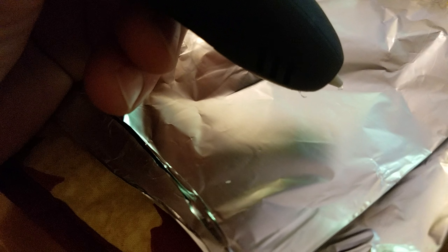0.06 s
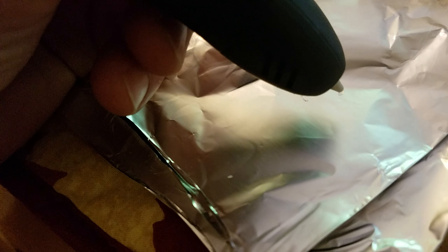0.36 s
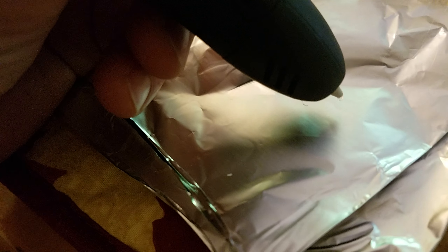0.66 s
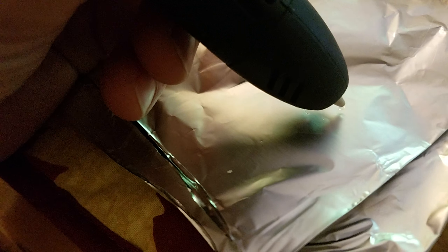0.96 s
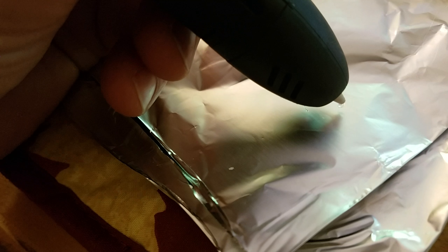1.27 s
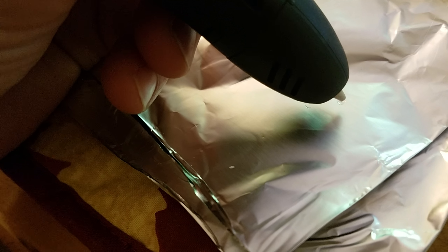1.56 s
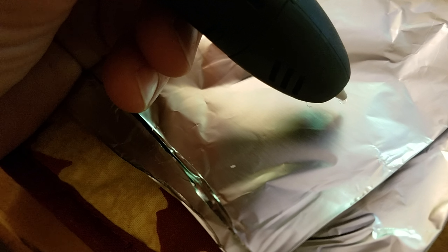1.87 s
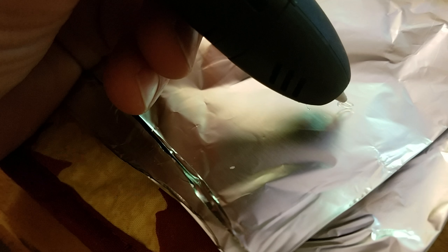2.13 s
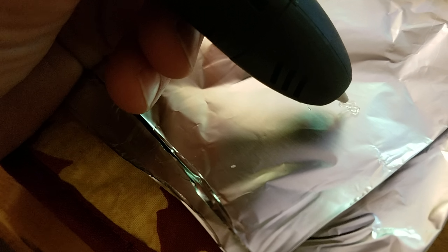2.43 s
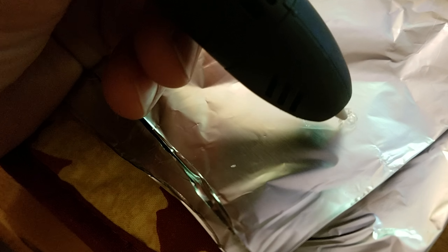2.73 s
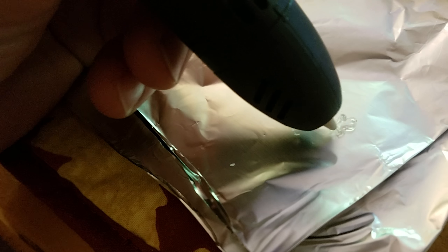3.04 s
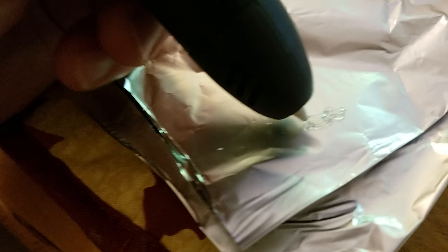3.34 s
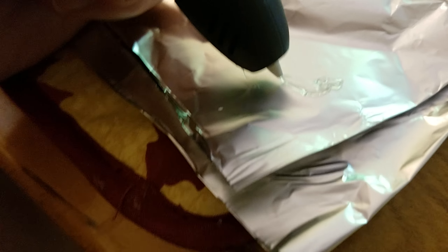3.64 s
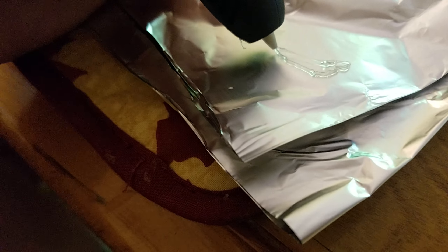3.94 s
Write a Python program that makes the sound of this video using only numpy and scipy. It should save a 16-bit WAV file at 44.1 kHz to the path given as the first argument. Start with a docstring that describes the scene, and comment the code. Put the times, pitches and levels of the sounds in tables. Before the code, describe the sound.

A 3D printing pen's small motor rasps and whines in rapid, even pulses, close on the left in a quiet room. One sharp snap comes before the middle, and soft finger thumps on the right cluster near the end.

```python
"""A handheld 3D printing pen feeds filament slowly, close to the left microphone in a quiet, small room.
Its geared motor is switched on about ten times a second, spins up with a rising whine and a gear rasp,
and coasts down again. The pen gives one sharp snap and a few small ticks. Fingers bump and rub the
camera body by the right microphone, which hears the pen more faintly."""
import sys
import numpy as np
from scipy import signal
from scipy.fft import rfft, irfft, next_fast_len
from scipy.io import wavfile
from scipy.ndimage import map_coordinates

SR = 44100
rng = np.random.default_rng(int(sys.argv[2]) if len(sys.argv) > 2 else 0)


def dump_mix(stems):
    """Bounce the given channels to the path in sys.argv[1] as a 16-bit WAV at rate SR."""
    frames = np.atleast_2d(stems).T  # one column per channel
    limited = np.clip(frames, -1, 1)  # hard clip at full scale
    pcm = np.round(limited * 32767).astype(np.int16)
    wavfile.write(sys.argv[1], SR, pcm)


N = 176400


def motor(teeth=9, far_alike=0.44):
    """The pen's gears rasp and whine close to the left microphone; the right one stands in shadow."""
    # gain at the far microphone against the near one (frequency [Hz], gain [dB])
    shadow = [(300, 14.5), (1000, -6), (1600, -9.5), (3000, -19), (5000, -17.5), (7800, -66), (10000, -41),
              (14000, -20.5), (15500, -53)]
    speed, tooth_hz, force = drive()
    tooth_phase = 2 * np.pi * np.cumsum(tooth_hz) / SR
    rasp, stray_rasp = gear_rasp(tooth_phase / teeth, speed, force)
    whine = gear_whine(tooth_phase, speed, force)
    far = whine + far_alike * rasp + np.sqrt(1 - far_alike ** 2) * stray_rasp
    return np.array([rasp + whine, far_microphone(far, shadow)])


def drive(on_s=.050, spin_up_s=.018, coast_s=.025):
    """Each pulse spins the motor up, then it coasts: speed (share of full), tooth rate in Hz, gear force."""
    # motor pulses (time [s], tooth rate the motor heads for [Hz], level [dB])
    pulses = [(.002, 3045, -1.5), (0.097, 3600, -1), (0.194, 3505, -1), (0.291, 3380, -1), (.390, 3786, -1),
              (.486, 3870, -1), (0.583, 3500, -0.5), (.682, 3870, -1), (0.78, 3902, -1), (.875, 3640, -1),
              (.977, 4050, -0.5), (1.070, 3750, -1), (1.169, 3840, -1.5), (1.269, 4380, -0.5),
              (1.363, 3870, -1.5), (1.464, 4170, -0.5), (1.558, 4020, 0), (1.658, 4050, -1),
              (1.757, 4380, 0), (1.853, 3900, -1), (1.952, 4300, -0.5), (2.047, 3840, -1),
              (2.145, 3810, -1), (2.244, 4080, -1), (2.340, 3600, -1), (2.440, 4020, -1), (2.538, 4020, 0),
              (2.633, 3640, -1), (2.732, 4140, -0.5), (2.827, 3750, -0.5), (2.925, 3780, -1),
              (3.024, 3663, -.5), (3.122, 3510, -1.5), (3.218, 3690, -0.5), (3.316, 3990, 0),
              (3.412, 3510, -0.5), (3.511, 3750, -1), (3.608, 3750, -2), (3.705, 3510, -2.5),
              (3.804, 3780, -3), (3.901, 3100, -4)]
    t = np.arange(int((on_s + coast_s) * SR)) / SR
    run_up = 1 - np.exp(-np.minimum(t, on_s) / spin_up_s)
    spin = run_up * np.clip(1 - (t - on_s) / coast_s, 0, 1)
    engage_s, hold_s, release_s = .010, 0.049, 0.017  # the gears take up their slack, scrape, and settle
    engage = np.minimum(t / engage_s, 1) ** 2
    bite = engage * np.exp(-.5 * (np.maximum(t - hold_s, 0) / release_s) ** 2)
    speed, tooth_hz, force = np.zeros((3, N))
    for s, hz, db in pulses:
        add(speed, s, spin)
        add(tooth_hz, s, hz * spin)
        add(force, s, amp(db) * bite)
    return np.abs(speed), tooth_hz, force


def gear_rasp(shaft, speed, force, whirr_share=.58, treble_hz=6000):
    """Teeth scrape in the shell, louder and brighter with speed: the near rasp and an unrelated stray one."""
    # slow drift of the treble (time [s], gain [dB])
    treble_drift = [(0, -0.5), (.6, -1), (1.4, .5), (2.4, -0.5), (3, -1.5), (3.3, -2), (4, 0.5)]
    grit = amp(np.sin(shaft) + 1.3 * wobble(1800))  # swings once a turn, and from tooth to tooth
    repeating = np.sqrt(whirr_share * speed) * whirr(shaft)
    contact = repeating + np.sqrt(1 - whirr_share) * rng.standard_normal(N)
    scrape = unit(filtered(grit * np.array([contact, rng.standard_normal(N)]), shell))
    low = filtered(scrape, lambda hz: 1 / (1 + (hz / treble_hz) ** 4))
    treble = (scrape - low) * speed ** 0.85 * amp(over_time(treble_drift))
    return amp(-42) * force * speed ** 0.31 * (low + treble)


def whirr(shaft, count=44, jitter_rad=.014):
    """The uneven teeth repeat their clatter every turn: a comb of shaft overtones, rms 1."""
    angle = shaft + jitter_rad * wobble(300)
    offsets = rng.uniform(0, 2 * np.pi, count)
    return unit(sum(np.sin(k * angle + offset) for k, offset in enumerate(offsets, 1)))


def gear_whine(tooth_phase, speed, force, swing_db=1.7, jitter_rad=.2):
    """Meshing teeth sing in wavering partials that rise and swell with speed."""
    # gear tones (multiple of the tooth rate [ratio], level [dB])
    partials = [(1, -45), (.5, -53), (.4, -55.5), (1.11, -58), (1.35, -53.5), (.89, -58)]
    # how well the shell radiates them (frequency [Hz], gain [dB])
    radiation = [(600, -7.5), (1100, -7.5), (1550, -1.5), (2000, -7), (2500, -2), (3100, -2.5),
                 (3800, -5.5), (5000, -11.5)]
    tones = np.zeros(N)
    for multiple, db in partials:
        level = amp(db + swing_db * wobble(25.155))
        tones += level * np.sin(multiple * tooth_phase + jitter_rad * wobble(400))
    return coloured(force * speed ** 1.39 * tones, radiation)


def shell(hz):
    """Gain of the pen's plastic shell: resonances on top of a broad colour."""
    # broad colour (frequency [Hz], gain [dB])
    colour = [(300, -28), (900, -25), (1300, -17.5), (2100, -13), (3000, -5.5), (4000, -9.5), (4700, -13.5),
              (5600, -17.5), (6600, -12.5), (8800, -13), (10500, -6), (12500, -4), (14500, -0.5),
              (16000, -20.5)]
    # resonances (centre [Hz], width [Hz], height above the colour [dB])
    peaks = [(1710, 490, 1.9), (7755, 880, 12.97), (12050, 510, 2.8), (14150, 1470, 9.3)]
    peaks_db = sum(db / (1 + (2 * (hz - centre) / width) ** 2) for centre, width, db in peaks)
    return amp(along(colour, hz) + peaks_db)


def far_microphone(x, shadow, delay_s=.00038):
    """The right microphone hears the motor later and, except in the lows, weaker."""
    return filtered(x, lambda hz: amp(along(shadow, hz)) * np.exp(-2j * np.pi * hz * delay_s))


def camera_swing(x, start_s=2.9, end_s=3.5):
    """The motor's colour shifts as the microphones swing round the pen."""
    # colour change from the new angle (frequency [Hz], gain [dB])
    new_angle = [(1500, 1), (3000, -1), (5500, 2), (7600, -4.5), (9500, 1), (11200, 1.5), (13000, -8),
                 (15000, -1)]
    share = over_time([(start_s, 0), (end_s, 1)])
    return (1 - share) * x + share * coloured(x, new_angle)


def snap(time_s=1.5438, scatter_db=-35, scatter_t60_s=0.019):
    """One hard, dry crack from the pen, on the left, with a short scatter off the things nearby."""
    # spectrum of the crack (frequency [Hz], level [dB])
    colour = [(120, -36), (200, -17), (851, -1), (2330, -11.5), (3830, -4.5), (5940, -14.5), (7830, -12),
              (10700, -12), (11900, -3), (13600, 1.5), (16000, -14.5)]
    t, track = np.arange(SR // 20) / SR, np.zeros(N)
    scatter = rng.standard_normal(len(t)) * amp(scatter_db - 60 * t / scatter_t60_s)
    paths = (t == 0) + scatter
    add(track, time_s, amp(-5) * signal.fftconvolve(paths, impulse(colour)))
    return np.array([track, amp(-13) * track])


def ticks():
    """Plastic and foil tick near the left microphone: brief puffs of noise, each in its own band."""
    # ticks (time [s], level [dB], attack [s], t60 [s], centre [Hz], width [octaves])
    events = [(0.2621, -34.5, 0.0013, 0.033, 12500, 1.16), (0.2816, -47, .0005, 0.061, 2200, 0.11),
              (.780, -39, .0001, 0.019, 12000, 5.4), (2.3455, -46, .0001, 0.019, 4750, 0.51),
              (2.9658, -45, .0002, .012, 1000, 1.1), (3.0304, -36.5, 0.00015, 0.023, 4900, 5.9),
              (3.2136, -46.5, 0.00025, .02, 450, 1.3), (3.4524, -45, 0.00028, .02, 800, 0.64),
              (3.495, -46, .0003, .025, 449, .8)]
    t, track = np.arange(SR // 10) / SR, np.zeros(N)
    for s, db, attack, t60, centre_hz, octaves in events:
        white = rng.standard_normal(N)
        puff = unit(filtered(white, lambda hz: np.exp(-.5 * (np.log2((hz + 1) / centre_hz) / octaves) ** 2)))
        envelope = amp(db - 60 * t / t60) * (1 - np.exp(-t / attack))
        add(track, s, puff[:len(t)] * envelope)
    return np.array([track, amp(-17.5) * track])


def finger_thud(start_hz=198, rest_hz=77.8, sag_s=0.0048, attack_s=0.0039, t60_s=0.11):
    """A finger bumps the camera body: the thud starts high and settles."""
    t = np.arange(SR // 5) / SR
    hz = rest_hz + (start_hz - rest_hz) * np.exp(-t / sag_s)
    envelope = (1 - np.exp(-t / attack_s)) * amp(-60 * t / t60_s)
    thud = np.sin(2 * np.pi * np.cumsum(hz) / SR) * envelope
    upper_mode = np.sin(2 * np.pi * 202.7 * t) * amp(-21 - 60 * t / 0.02)
    return (thud + upper_mode) * (1 - np.exp(-t / 0.0013))  # soft flesh rounds off the contact


def handling():
    """Fingers bump and rub the camera body, almost only at the right microphone."""
    # finger bumps (time [s], level [dB])
    bumps = [(0.4433, -36.5), (.743, -27.5), (1.594, -39.5), (1.807, -22.5), (2.268, -44), (2.684, -20),
             (3.165, -29.5), (3.2158, -19.5), (3.25, -28.5), (3.271, -25), (3.453, -20), (3.474, -24.5),
             (3.493, -22.5), (3.51, -28), (3.543, -30.5), (3.609, -44)]
    # rubbing of the hand (time [s], level [dB])
    grip = [(0, -104), (.4, -69.5), (.9, -60), (1.4, -63), (1.65, -58), (2.2, -60.5), (2.9, -62),
            (3.4, -52), (3.8, -54.5), (4, -62.5)]
    # spectrum of the rubbing (frequency [Hz], level [dB])
    grip_colour = [(20, -15.5), (45, -1), (75, -5), (140, -10.5), (250, -7.5), (400, -25.5), (1000, -28.5),
                   (4000, -48.5)]
    track = noise(grip_colour) * amp(over_time(grip) + 3.8 * wobble(18))
    thud = finger_thud()
    for s, db in bumps:
        add(track, s, amp(db) * thud)
    return np.array([amp(-25.5) * track, track])


def room(x):
    """The small room's faint tail at both microphones; the highest treble dies first."""
    # decay of the room (frequency [Hz], t60 [s])
    decay = [(300, 0.27), (3000, 0.42), (8000, 0.55), (15000, 0.11)]
    # colour of the tail (frequency [Hz], gain [dB])
    colour = [(500, 9), (1200, 0), (3000, -7.5), (7000, -19.5), (14000, -16)]
    hz, t, spectra = signal.stft(rng.standard_normal((2, SR // 2)), SR, nperseg=256)
    fade = amp(-60 * t / along(decay, hz)[:, None])
    tail = signal.istft(spectra * fade, SR, nperseg=256)[1]
    wet = signal.fftconvolve(x[None], tail / np.linalg.norm(tail[0]), axes=1)[:, :N]
    return coloured(wet, colour)


def room_tone(alike=0.45):
    """Quiet room noise, partly shared by the two microphones."""
    # spectrum of the room noise (frequency [Hz], level [dB])
    colour = [(20, -5.5), (60, 2.5), (130, -3.5), (260, 1), (350, -4), (700, -8.5), (1500, -18),
              (3000, -18), (6000, -26.5), (9000, -29), (13000, -21), (16000, -23.5)]
    shared = np.sqrt(alike) * noise(colour)
    separate = np.sqrt(1 - alike) * np.array([noise(colour), noise(colour)])
    return amp(-63.5) * (shared + separate)


def amp(db):
    """Decibels to gain."""
    return 10 ** (np.asarray(db) / 20)


def unit(x):
    """Scale to rms 1."""
    return x / np.sqrt(np.mean(x ** 2) + 1e-20)


def along(points, hz):
    """(Hz, value) points read on a log axis."""
    knots_hz, values = np.transpose(points)
    return np.interp(np.log(hz + 1), np.log(knots_hz + 1), values)


def over_time(points):
    """(s, value) points read at every sample."""
    return np.interp(np.arange(N) / SR, *np.transpose(points))


def wobble(rate):
    """A smooth random curve, rate knots a second."""
    return map_coordinates(rng.standard_normal(int(N * rate / SR) + 4), [np.arange(N) * rate / SR])


def filtered(x, response):
    """x times a response of frequency."""
    size = next_fast_len(N + SR // 4)
    return irfft(rfft(x, size) * response(np.fft.rfftfreq(size, 1 / SR)), size)[..., :N]


def coloured(x, colour):
    """x shaped by a (Hz, dB) colour."""
    return filtered(x, lambda hz: amp(along(colour, hz)))


def noise(colour):
    """Noise of rms 1 with the given (Hz, dB) colour."""
    return unit(coloured(rng.standard_normal(N), colour))


def impulse(colour, size=2048):
    """A causal click of peak 1 with the given (Hz, dB) colour."""
    cepstrum = irfft(np.log(amp(along(colour, np.fft.rfftfreq(size, 1 / SR)))))
    fold = np.r_[1, np.full(size // 2 - 1, 2), 1, np.zeros(size // 2 - 1)]  # minimum phase
    click = irfft(np.exp(rfft(cepstrum * fold)))
    return click / np.abs(click).max()


def add(track, s, sound):
    """Mix a sound into a track at time s."""
    i = max(round(s * SR), 0)
    track[i:i + len(sound)] += sound[:N - i]


def scene():
    """The pen at close range in a quiet room, and the hand on the camera."""
    pen = camera_swing(motor()) + ticks()
    return pen + amp(-12.5) * room(pen[0]) + snap() + handling() + room_tone()


def record(dry):
    """The camera keeps nothing above its band limit."""
    top_hz = 16150
    return filtered(dry, lambda hz: 1 / np.sqrt(1 + (hz / top_hz) ** 160))


dry = scene()
out = record(dry)
dump_mix(out)
```